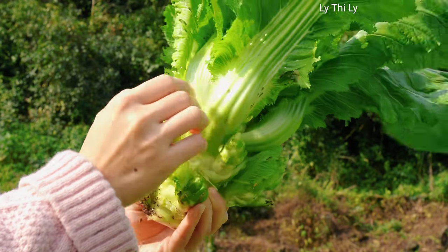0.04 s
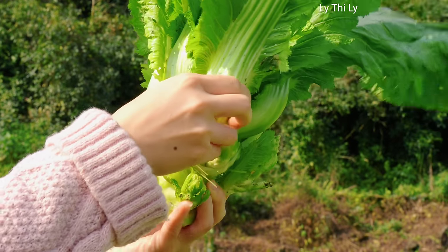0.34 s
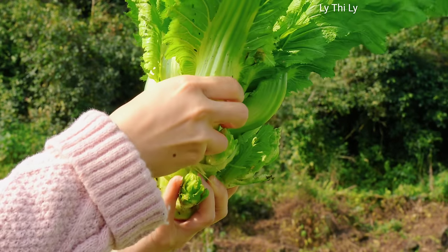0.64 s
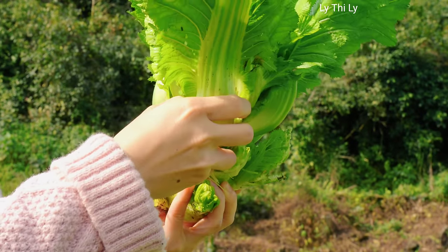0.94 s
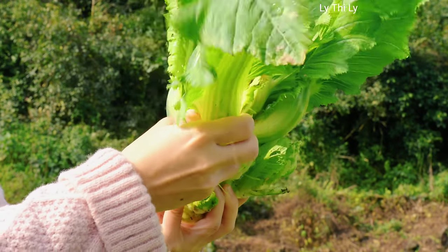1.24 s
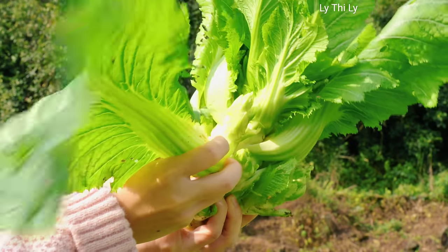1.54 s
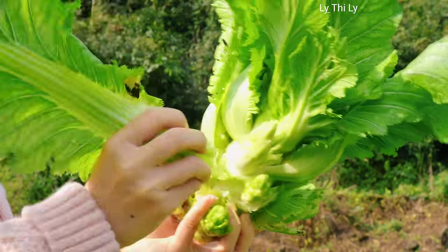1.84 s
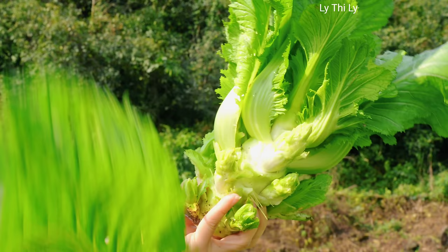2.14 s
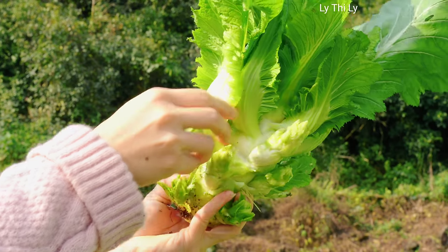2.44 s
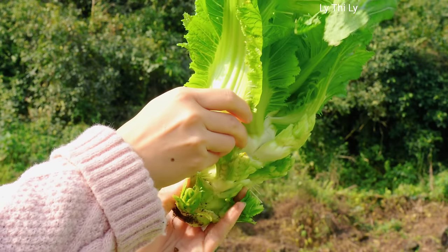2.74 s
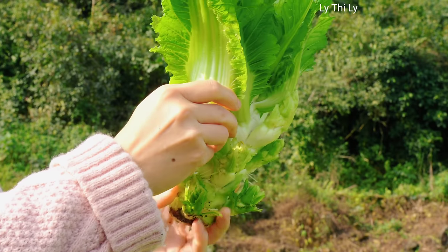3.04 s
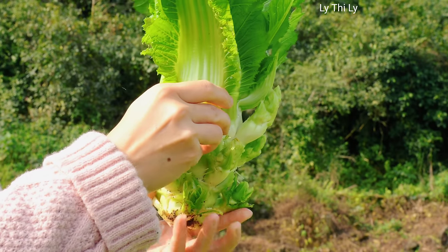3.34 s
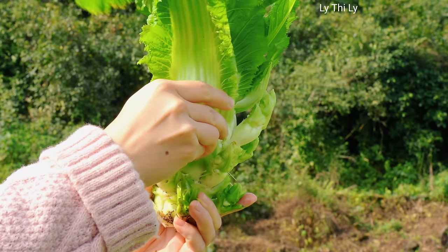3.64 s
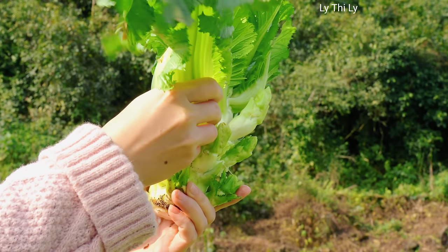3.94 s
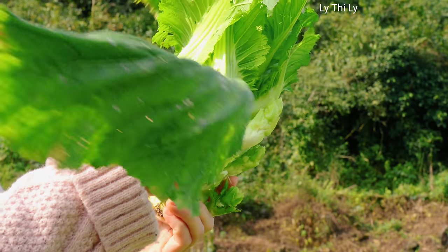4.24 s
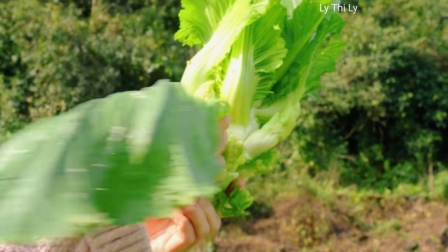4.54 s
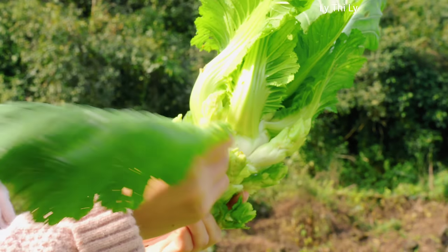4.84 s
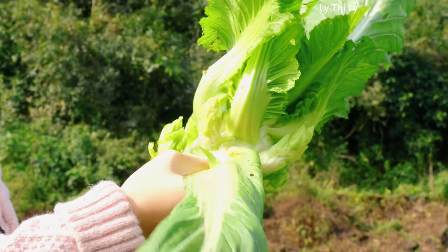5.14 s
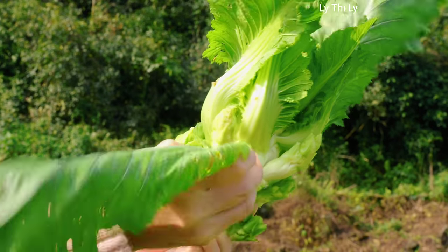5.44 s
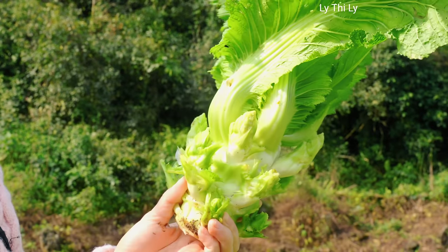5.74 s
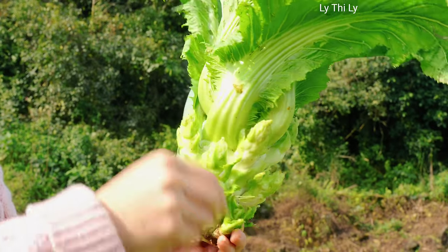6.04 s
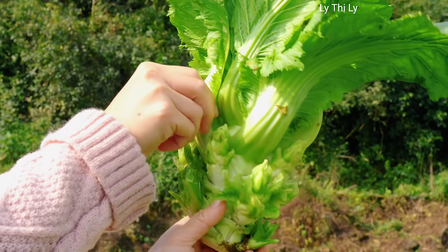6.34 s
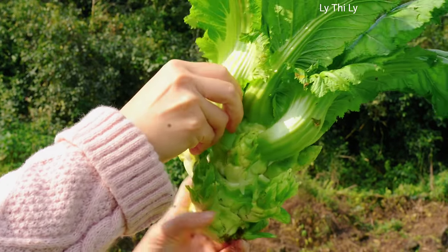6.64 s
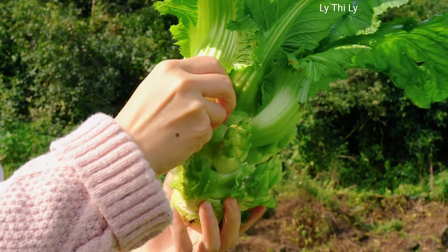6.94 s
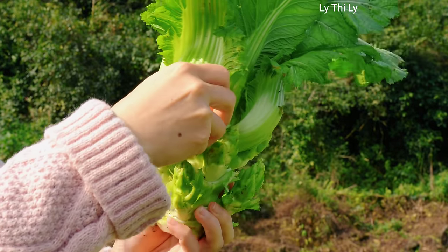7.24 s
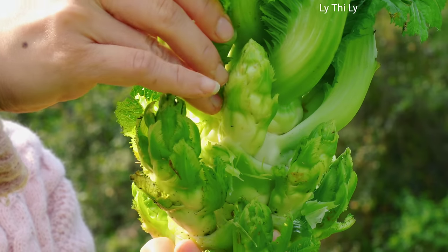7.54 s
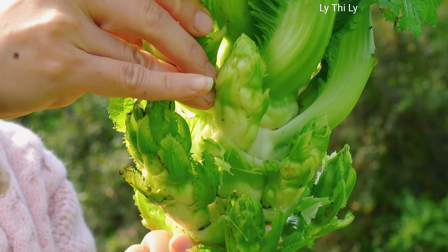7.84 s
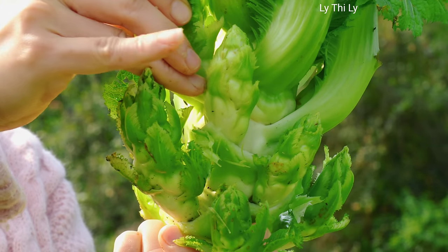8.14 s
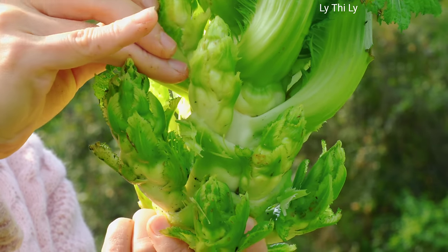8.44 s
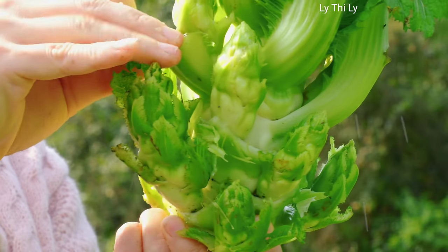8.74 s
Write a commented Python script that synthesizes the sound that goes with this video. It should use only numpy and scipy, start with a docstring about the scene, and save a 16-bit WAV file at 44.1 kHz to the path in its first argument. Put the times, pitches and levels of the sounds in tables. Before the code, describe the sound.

A low rumble of wind on the microphone and a soft garden hush lie under the close sound of fresh stalks being broken by hand. They crack fibre by fibre in several sharp bursts, amid skin rubbing, leaf rustle and tiny squeaks. Past the middle, a small bird repeats a whistled rising and falling chirp, echoing lightly off bushes, while the handling quietens before a last crisp snap.

```python
"""Light ticks over a low rumble, then crisp cracks: a head of leafy greens is stripped by hand in a garden.
Stalks break fibre by fibre, each break ringing the stalk and knocking the hand, while fingers rub the
stems and the leaves rustle and squeak. In the second half a small bird whistles an arched chirp eight
times. The rumble is a breeze on the microphone, which overloads on the loudest snaps. Bushes echo the
greens and the bird; behind them lie the garden's hush and a faint, distant drone."""
import sys
import numpy as np
from scipy import signal
from scipy.fft import rfft, irfft, next_fast_len
from scipy.io import wavfile
from scipy.ndimage import uniform_filter1d, map_coordinates

SR = 44100
rng = np.random.default_rng(int(sys.argv[2]) if len(sys.argv) > 2 else 0)


def to_wav(s):
    """Save 16-bit WAV."""
    ch = np.atleast_2d(s).T  # columns
    pcm = np.round(np.clip(ch, -1, 1) * 32767)  # PCM
    wavfile.write(sys.argv[1], SR, pcm.astype(np.int16))


N = 387807

# Resonances of the juicy stalk: pitch_hz, level_db, t60_s
STALK_MODES = [(1160, -3.5, 0.015), (1330, 0, 0.0098), (1584, -2, 0.013), (1874, -2, 0.011),
               (2310, -4, 0.015), (2770, -1, 0.009), (2950, 1.5, 0.015), (3374, 0, 0.0098)]
# Bright tone of a splitting fibre: frequency_hz, level_db
CRACK_SPECTRUM = [(1000, -12), (2000, -16), (3500, -4), (4500, 0), (7000, -1), (10000, 1), (15000, -8),
                  (17000, -38)]
# Featured cracks and ticks: start_s, ring_db, crack_db, knock_db, ring_centre_hz, tilt_db_per_octave
SNAP_CUES = [(0.1835, -35, -54, -44, 2600, -4), (0.4264, -38, -51, -51, 2280, -6),
             (0.5556, -35.5, -43, -55, 2410, -3), (0.5768, -39, -46, -55, 2910, -12),
             (0.8012, -41, -45.5, -40, 2410, 2), (0.913, -16.5, -31, -21.5, 1170, -8),
             (1.0216, -34.5, -41, -55, 2800, -14), (1.1696, -28, -34.5, -47, 1870, -4),
             (1.1845, -30, -30.5, -41, 2690, -12), (1.208, -7, -16.5, -29, 1990, -6),
             (1.2278, -17.5, -24, -38, 2780, -2), (1.241, -11, -18, -34, 2290, -3),
             (1.2431, -10.5, -24, -29, 2680, 2), (1.2533, -21, -24.5, -43, 2470, 6),
             (1.498, -29, -35.5, -35.5, 2320, 10), (1.5764, -8, -23, -19.5, 2180, 1),
             (1.629, -19, -26.5, -39, 2500, -3), (1.7776, -32, -35, -46, 2510, 9),
             (1.8069, -19, -28, -31, 2130, 6), (1.851, -33.5, -32, -46, 2510, 11),
             (1.895, -16.5, -22, -42, 1930, 2), (1.9011, -16, -15.5, -33, 1930, 16),
             (2.7979, -26.5, -54, -24, 1410, -10), (2.8155, -19, -29, -23, 2020, 1),
             (2.827, -33, -32, -37, 2580, -3), (3.3377, -29.5, -43, -44, 2430, -1),
             (3.347, -25.5, -42, -50, 2710, -1), (3.702, -12.5, -28.5, -33, 2030, -11),
             (3.7335, -17.5, -25.5, -49, 2180, -6), (3.8218, -31, -30, -40, 2610, -7),
             (3.8291, -9, -19.5, -30, 1920, -4), (3.8423, -18.5, -24, -35, 2110, 2),
             (3.8444, -9.5, -31, -31, 2400, -5), (3.8493, -10.5, -22, -30, 1840, -1),
             (3.8743, -18, -23, -34, 2320, -3), (3.8865, -18.5, -28, -42, 2490, 5),
             (3.9579, -30, -33, -31, 2440, 13), (4.127, -26.5, -38.5, -37, 2720, -8),
             (4.393, -27, -48, -38, 2120, -10), (4.6452, -25, -36, -40, 2650, 10),
             (4.6634, -32, -31.5, -42, 2790, -2), (4.6805, -28.5, -32, -47, 2680, -2),
             (4.8379, -41.5, -38.5, -53, 2490, 5), (4.8824, -43, -40.5, -55, 2600, 6),
             (4.9513, -27, -29, -55, 2810, 0), (4.9823, -19.5, -24, -49, 2610, 0),
             (5.132, -28.5, -32, -55, 2890, 4), (5.1412, -32, -22, -54, 2570, 15),
             (5.1583, -40, -20, -50, 3020, 10), (5.1751, -23.5, -20, -39, 2370, 0),
             (5.2262, -41, -33.5, -55, 2880, 1), (5.3505, -42, -33.5, -43, 3030, 3),
             (5.3973, -32, -30.5, -49, 2990, 0), (5.449, -17, -19.5, -27, 2770, 0),
             (5.4546, -18, -25, -33, 2600, 2), (6.362, -28, -35, -32, 3130, 5),
             (7.625, -30, -39, -35, 2710, 3), (7.6869, -37, -35.5, -52, 2300, 3),
             (7.722, -36.5, -41, -32, 2100, 6), (7.89, -31, -39.5, -47, 2640, 1),
             (8.0575, -39.5, -58, -55, 2630, -2), (8.364, -37, -44.5, -39, 2890, 7),
             (8.435, -38.5, -65, -55, 1950, -3), (8.579, -11.5, -24, -20, 2650, -2),
             (8.5826, -16.5, -31, -29, 1980, -10), (8.5974, -13.5, -26, -24, 2237, -13),
             (8.603, -18.5, -37, -30, 2390, 1), (8.6545, -19, -29.5, -30, 1945, 1),
             (8.685, -27, -30, -20.5, 2155, -13)]
def snaps(crack_t60_s=0.0066, crack_rise_s=0.00011, pivot_hz=8500, ring_width=0.44,
          knock_hz=370, hollow_hz=720, knock_t60_s=0.018, knock_trim_db=-1):
    """Each fibre breaks with a sharp crack, rings the stalk for a few cycles and knocks the hand."""
    out, t = np.zeros(N), np.arange(SR // 25) / SR
    hz, mode_db, t60 = np.transpose(STALK_MODES)[:, :, None]
    for start, ring_db, crack_db, knock_db, ring_hz, tilt in SNAP_CUES + small_snaps():
        detune, strength, polarity = rng.standard_normal((3, len(STALK_MODES), 1))
        # each fibre favours the stalk's modes near its own pitch
        weight = amp(mode_db + 0.99 * strength) * np.exp(-.5 * (np.log(hz / ring_hz) / ring_width) ** 2)
        modes = np.sin(2 * np.pi * hz * np.exp(0.041 * detune) * t)
        ring = np.sum(np.sign(polarity) * weight * amp(-60 * t / t60) * modes, axis=0)
        # thin skin splits brighter than thick flesh
        colour = [(f, db + tilt * max(np.log2(f / pivot_hz), -1)) for f, db in CRACK_SPECTRUM]
        envelope = amp(-60 * t / crack_t60_s) * (1 - np.exp(-t / crack_rise_s))
        crack = coloured(rng.standard_normal(len(t)), colour) * envelope
        # the whole head answers with two low, quickly damped modes
        turn = 2 * np.pi * np.exp(0.13 * rng.normal()) * t
        knock = (np.sin(knock_hz * turn) - 0.92 * np.sin(hollow_hz * turn)) * amp(-60 * t / knock_t60_s)
        for layer, db in (ring, ring_db), (crack, crack_db), (knock, knock_db + knock_trim_db):
            burst_rms = np.sqrt(np.sum(layer ** 2) / (.005 * SR))  # as if packed into 5 ms
            add(out, start, amp(db) * layer / burst_rms)
    return out


# Hand strokes, voiced here and in stroke_gains: start_s, length_s, rub_db, rustle_db, crackle_db
HAND_STROKES = [(0.169, .035, -46.5, -55, -39.5), (0.43, .025, -50, -58, -47), (0.525, .025, -53, -52, -49),
                (0.669, .035, -48, -38, -50), (1.014, .12, -50, -52.5, -45), (1.222, .05, -35, -32.5, -31),
                (1.31, .17, -47.5, -53, -41), (1.519, .11, -42.5, -42, -36), (1.658, .17, -50, -48, -38.5),
                (1.899, .006, -37, -44, -34), (1.942, .13, -48, -57, -40.5), (2.205, .11, -51, -53, -56),
                (2.348, .055, -47.5, -44.5, -39), (2.813, .018, -25, -45, -27),
                (2.847, .075, -39.5, -51, -40), (2.965, .06, -45.5, -59, -44),
                (3.041, .045, -42.5, -46.5, -44), (3.301, .19, -53, -62, -45),
                (3.546, .1, -55.5, -53, -43.5), (3.721, .05, -46.5, -50, -39),
                (3.837, .06, -33.5, -40, -22.5), (3.938, .025, -49, -36.5, -36),
                (4.003, .02, -43, -45, -31.5), (4.117, .12, -55, -53, -48), (4.309, .11, -49, -47, -39.5),
                (4.458, .1, -53.5, -54.5, -44), (4.647, .057, -48.5, -33.5, -38.5),
                (4.731, .1, -64, -57, -51), (4.945, .07, -46.5, -39, -46), (5.07, .05, -47.5, -42, -40.5),
                (5.136, .06, -48.5, -34, -36), (5.242, .09, -65, -54, -45), (5.369, .08, -52, -44, -40),
                (5.475, .02, -45.5, -56, -50), (5.584, .06, -44.5, -58, -48), (5.865, .09, -52, -43, -46),
                (6.311, .045, -29, -40, -37), (6.373, .04, -40.5, -49, -48), (6.445, .08, -46, -55, -49),
                (6.663, .1, -49.5, -51, -55), (6.882, .01, -66, -50, -54), (7.332, .13, -53.5, -58, -52),
                (7.597, .035, -37, -53, -41), (7.75, .73, -77, -78, -53), (8.58, .02, -44, -51, -15),
                (8.646, .06, -42.5, -47, -37)]
def small_snaps(count=165, spread_db=2.0, crack_db=-5, knock_db=-13, centre_hz=2550):
    """Cues for small fibres giving way at random in the strokes; leafier strokes crack brighter."""
    start, length, rub_db, rustle_db, crackle_db = np.transpose(HAND_STROKES)
    ends = np.cumsum(length)  # strokes laid end to end
    moment = (np.arange(count) + rng.random(count)) / count * ends[-1]
    stroke = np.searchsorted(ends, moment)
    onset = start[stroke] + ends[stroke] - moment
    strength, pitch, edge = rng.standard_normal((3, count))
    ring_db = crackle_db[stroke] + spread_db * strength
    leafy_db = (rustle_db - rub_db)[stroke]
    edge_db = ring_db + crack_db + 0.85 * leafy_db + edge
    ring_hz = centre_hz * np.exp(0.11 * pitch)
    return list(zip(onset, ring_db, edge_db, ring_db + knock_db, ring_hz, 0.27 * leafy_db))


def stroke_gains(attack_s=0.027, release_s=0.05, depth_db=22, sag_db=0.5):
    """Rub and rustle envelopes: each stroke swells, sags as the pressure eases, and fades."""
    # the head never rests quite still in the hand
    rub_power, rustle_power = np.full(N, amp(-60) ** 2), np.full(N, amp(-67.5) ** 2)
    for start, length, rub_db, rustle_db, _ in HAND_STROKES:
        t = np.arange(-2 * attack_s, length + 2 * release_s, 1 / SR)
        fade = np.maximum(-t / attack_s, 0) + np.maximum((t - length) / release_s, 0)
        shape = amp(-depth_db * fade - sag_db * np.clip(t / length, 0, 1))
        add(rub_power, start - 2 * attack_s, (amp(rub_db) * shape) ** 2)
        add(rustle_power, start - 2 * attack_s, (amp(rustle_db) * shape) ** 2)
    return np.sqrt(rub_power), np.sqrt(rustle_power)


# Full-bodied rub of skin on stalk: frequency_hz, level_db
RUB_SPECTRUM = [(100, -35), (170, -1), (322, -4.5), (597, -3.5), (885, -3), (1800, -5), (2020, -2),
                (2620, -6.5), (3480, -5), (7500, -23), (9750, -21.5), (13700, -35), (15000, -31)]
# Thin, airy rustle of leaves: frequency_hz, level_db
LEAF_SPECTRUM = [(1200, -27), (2500, 4), (3300, 6.5), (4500, -7.5), (6500, -5), (9500, 0.5), (12000, -1),
                 (15000, -4), (16500, -32)]
def handling(rub_trim_db=4, crinkle_db=2.0):
    """Skin stutters over the stalks; leaf blades slide and crinkle against each other."""
    rub_gain, rustle_gain = stroke_gains()
    skin = patchy(coloured(skin_slips(), RUB_SPECTRUM), depth_db=3.5)
    slide = coloured(rng.standard_normal(N), LEAF_SPECTRUM)
    crinkle = amp(crinkle_db) * coloured(crinkles(), LEAF_SPECTRUM)
    blades = patchy(slide + crinkle, depth_db=2.5)
    rub = skin * rub_gain * amp(rub_trim_db + 2.2 * wobble(70))
    rustle = blades * rustle_gain * amp(3.4 * wobble(60))
    return rub + rustle


def skin_slips(per_s=1600, spread_db=5.5, friction_db=-2.5):
    """Tiny slips of scattered size at random moments, on a bed of smooth friction."""
    sizes = amp(spread_db * np.minimum(rng.exponential(size=N), 3)) * rng.choice([-1, 1], N)
    slips = unit(sizes * (rng.random(N) < per_s / SR))
    return unit(slips + amp(friction_db) * rng.standard_normal(N))


def crinkles(per_s=320, centre_hz=7000, pitch_spread=0.49, decay_db_per_cycle=5, spread_db=5):
    """Little folds of leaf pop over, each at its own pitch and for only a few cycles."""
    when, pitch, size, phase = rng.random((int(per_s * N / SR), 4)).T[:, :, None]
    hz = np.minimum(centre_hz * (pitch / (1 - pitch)) ** (pitch_spread / 2), SR / 3)
    size_db = spread_db * np.minimum(-np.log(1 - size), 3)
    samples = np.arange(128)
    cycles = hz * samples / SR
    pops = amp(size_db - decay_db_per_cycle * cycles) * np.sin(2 * np.pi * (cycles + phase))
    positions = (when * N).astype(int) + samples
    return unit(np.bincount(positions.ravel(), pops.ravel(), N)[:N])


def patchy(x, depth_db):
    """Folds keep changing shape, so patches of the spectrum swell and fade."""
    bands = signal.stft(x, nperseg=256)[2]
    patches = uniform_filter1d(rng.standard_normal(bands.shape), size=7, axis=0)
    patches = uniform_filter1d(patches, size=12, axis=1)
    return unit(signal.istft(bands * amp(depth_db * unit(patches)), nperseg=256)[1][:N])


# The hand closes on the head: start_s, level_db, pitch_hz, length_s
PALM_THUDS = [(2.80, -34, 312, 0.088), (6.305, -29, 304, 0.082), (7.585, -28.5, 251, 0.05)]
# Waxy blades catch on each other: start_s, level_db, pitch_hz, length_s
LEAF_SQUEAKS = [(1.311, -35, 7850, 0.019), (2.567, -45, 7700, 0.013), (3.771, -35.5, 7700, 0.012),
                (4.925, -35, 5070, 0.027)]
def contacts(thud_width=0.36, squeak_width=0.18):
    """The palm thuds dully and wet leaves squeak, each a short swell of fuzzy resonance."""
    out = np.zeros(N)
    for cues, width in (PALM_THUDS, thud_width), (LEAF_SQUEAKS, squeak_width):
        for start, db, hz, length in cues:
            swell = np.sqrt(np.abs(np.hanning(int(length * SR))))
            tone = noise_band(SR // 4, hz, width * hz)[:len(swell)]
            add(out, start, amp(db) * swell * unit(tone))
    return out


# The rising and the falling note of a chirp: offset_s, pitch_hz, level_db
RISING_NOTE = [(.003, 2130, -45), (.006, 2170, -20.5), (.021, 2245, -11), (.033, 2634, -4.5),
               (.045, 3360, 2.5), (.054, 4030, -4), (.063, 4560, -8.5), (.069, 5450, -16.5),
               (.077, 5900, -22), (.089, 5980, -28)]
FALLING_NOTE = [(0.112, 4810, -40), (.115, 4313, -18), (.120, 3605, -2.5), (.127, 3290, 4.5),
                (.137, 2850, -2.5), (.143, 2380, -25), (.151, 2100, -28)]
# The bird's eight calls: start_s, level_db, pitch_ratio
CHIRP_CUES = [(5.245, -26, 0.94), (5.543, -23, 0.97), (5.845, -20.5, 0.97), (6.169, -20, 0.99),
              (6.485, -19.5, 0.97), (6.811, -18, 1), (7.139, -19.5, 0.99), (7.473, -23.5, 0.96)]
def bird(trim_db=-1, waver=0.011, flutter_db=1.5):
    """A pure whistle swept up, a short gap, and a quick slide down; a little different every time."""
    out = np.zeros(N)
    drift, flutter = 1 + waver * wobble(250), flutter_db * wobble(300)
    for note in (RISING_NOTE, FALLING_NOTE):
        offset, hz, db = np.transpose(note)
        t = np.arange(offset[0], offset[-1], 1 / SR)
        pitch = uniform_filter1d(np.interp(t, offset, hz), size=200)
        shape_db = np.interp(t, offset, db)
        for start, level_db, ratio in CHIRP_CUES:
            now = round((start + offset[0]) * SR) + np.arange(len(t))
            phase = 2 * np.pi * np.cumsum(pitch * ratio * drift[now]) / SR
            envelope = amp(trim_db + level_db + shape_db + flutter[now])
            add(out, start + offset[0], envelope * np.sin(phase))
    return out


# Low end of the breeze on the microphone: frequency_hz, level_db
RUMBLE_SPECTRUM = [(8.8, -22), (15, -1.5), (33, 2), (57, -1), (137, -13), (184, -26), (239, -37),
                   (330, -44.5), (430, -76), (730, -120)]
# Level ride of the gusts: time_s, buffet_db, flutter_db
GUSTS = [(0.0, -24, -26), (0.07, -11, -20), (0.12, -20, -23.5), (0.73, -16.5, -24.5), (1.13, -21.5, -26.5),
         (1.2, -27.5, -36.5), (1.91, -26.5, -26.5), (2.05, -13.5, -32), (2.08, -18, -24), (2.37, -34, -31),
         (2.62, -21.5, -27.5), (4.11, -31.5, -38), (5.07, -26.5, -33.5), (5.26, -24, -24),
         (5.51, -23.5, -29.5), (6.19, -28.5, -32.5), (7.17, -24, -32), (7.56, -33, -39), (7.81, -19, -26.5),
         (7.96, -29, -31), (8.03, -18, -35), (8.1, -14, -26.5), (8.32, -22.5, -32.5), (8.42, -14.5, -21.5),
         (8.69, -18, -30), (8.79, -22, -27.5)]
def wind(split_hz=70, fine_hz=160, calm_db=-30, brighten=0.52):
    """Large eddies heave the diaphragm, smaller ones flutter above; the finest grow fastest in a gust."""
    def below(hz, edge):
        return 1 / (1 + (hz / edge) ** 8)

    def eddies(share):
        """A band of rumble, levelled so that the gusts alone set its strength."""
        rumble = coloured(rng.standard_normal(N), RUMBLE_SPECTRUM)
        band = unit(filtered(rumble, lambda hz: np.sqrt(share(hz))))
        return band / np.sqrt(np.abs(uniform_filter1d(band ** 2, size=SR // 6)) + 1e-6)

    buffet_db, flutter_db = curves(GUSTS)
    fine_db = flutter_db + brighten * (flutter_db - calm_db)
    large = eddies(lambda hz: below(hz, split_hz))
    small = eddies(lambda hz: 1 - below(hz, split_hz))
    fine = filtered(small, lambda hz: 1 - below(hz, fine_hz))
    return amp(buffet_db) * large + amp(flutter_db) * (small - fine) + amp(fine_db) * fine


# Tail length of the bushes' echo: frequency_hz, t60_s
ECHO_DECAY = [(300, 0.5), (1500, 0.6), (3200, 0.42), (4500, 0.4), (6000, 0.5), (14000, 0.2)]
# Tone of that echo and of the early reflections: frequency_hz, level_db
ECHO_SPECTRUM = [(200, -1), (1500, -2), (2400, -3.5), (2900, -2), (3300, 0.5), (3800, -2), (4400, 3),
                 (6000, 2.5), (8000, -3.5), (14000, -6.5)]
def bush_echo(x):
    """The diffuse answer of the bushes, each frequency dying at its own speed."""
    hz, t, bands = signal.stft(rng.standard_normal(SR * 3 // 4), SR, nperseg=256)
    gain_db = along(ECHO_SPECTRUM, hz)[:, None] - 60 * t / along(ECHO_DECAY, hz)[:, None]
    tail = signal.istft(bands * amp(gain_db), SR, nperseg=256)[1]
    return signal.fftconvolve(x, tail / np.linalg.norm(tail))[:N]


def early_reflections(x, t60_s=0.036, rise_s=0.0017):
    """Arms, leaves and ground scatter a close sound back within a few hundredths of a second."""
    t = np.arange(SR // 12) / SR
    envelope = amp(-60 * t / t60_s) * (1 - np.exp(-t / rise_s))
    tail = coloured(rng.standard_normal(len(t)), ECHO_SPECTRUM) * envelope
    return signal.fftconvolve(x, tail / np.linalg.norm(tail))[:N]


# Ambience bed of the garden: frequency_hz, level_db
HUSH_SPECTRUM = [(130, -7), (220, 0), (270, -0.5), (390, -7), (620, -9.5), (900, -12.5), (1400, -14),
                 (2200, -18.5), (2800, -13), (3300, -13), (4200, -28), (6100, -29.5), (10000, -35),
                 (15500, -34.5)]
# Level ride of the distant drone: time_s, gain_db
DRONE_RIDE = [(0, -3), (2.0, -4), (2.5, 1), (4.8, 2), (5.6, -3), (8.79, -0.5)]
def garden(hush_db=-46, drone_db=-57, drone_hz=545):
    """The steady hush of the garden, with a faint distant drone swelling and easing."""
    hush = coloured(rng.standard_normal(N), HUSH_SPECTRUM) * amp(hush_db + wobble(3.05))
    drone = unit(noise_band(N, drone_hz, half_width_hz=16))
    return hush + drone * amp(drone_db + curves(DRONE_RIDE)[0])


def amp(db):
    """Decibels to gain."""
    return 10 ** (np.asarray(db) / 20)


def unit(x):
    """Scale to rms 1."""
    return x / np.sqrt(np.mean(x ** 2) + 1e-20)


def along(points, hz):
    """Read (frequency_hz, value) points on a log axis."""
    frequencies, values = np.transpose(points)
    return np.interp(np.log(hz + 1), np.log(frequencies + 1), values)


def curves(rows):
    """One value per sample for each column after the time."""
    times, *columns = np.transpose(rows)
    return [np.interp(np.arange(N) / SR, times, column) for column in columns]


def wobble(rate):
    """A smooth random curve, rate knots a second."""
    return map_coordinates(rng.standard_normal(int(N * rate / SR) + 4), [np.arange(N) * rate / SR])


def filtered(x, response):
    """x through a frequency response."""
    size = next_fast_len(len(x) + 8192)
    return irfft(rfft(x, size) * response(np.fft.rfftfreq(size, 1 / SR)), size)[:len(x)]


def coloured(x, spectrum):
    """x shaped by a spectrum, at rms 1."""
    return unit(filtered(x, lambda hz: amp(along(spectrum, hz))))


def noise_band(samples, centre_hz, half_width_hz):
    """Noise through one resonant peak."""
    noise = rng.standard_normal(samples)
    return filtered(noise, lambda hz: 1 / (1 + ((hz - centre_hz) / half_width_hz) ** 2))


def add(track, start_s, sound):
    """Mix a sound into the track."""
    part = track[max(0, round(start_s * SR)):][:len(sound)]
    part += sound[:len(part)]


def scene():
    """Close hands, a farther bird, and the air around them, in mono."""
    greens = snaps() + handling() + contacts()
    song = bird()
    early = early_reflections(amp(-14.5) * greens + amp(-16.5) * song)
    late = bush_echo(amp(-28.5) * greens + amp(-9.5) * song)
    return (greens + song + early + late + wind() + garden())[None]


def record(dry, top_hz=15700):
    """The loudest snaps flatten at full scale; nothing passes above the band limit."""
    return np.array([filtered(np.clip(x, -1, 1), lambda hz: hz < top_hz) for x in dry])


dry = scene()
out = record(dry)
to_wav(out)
```